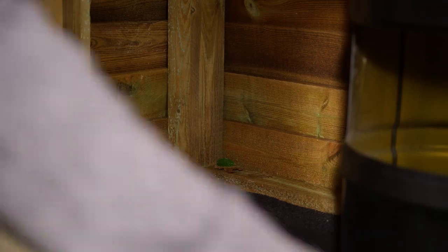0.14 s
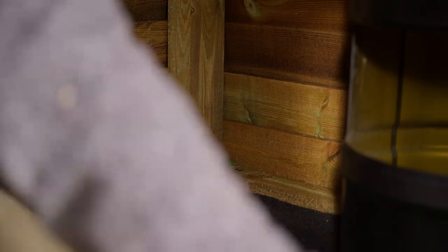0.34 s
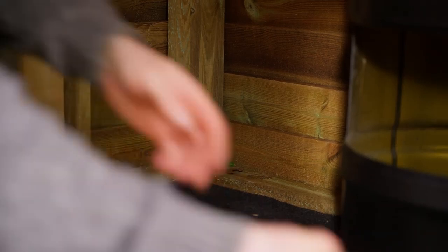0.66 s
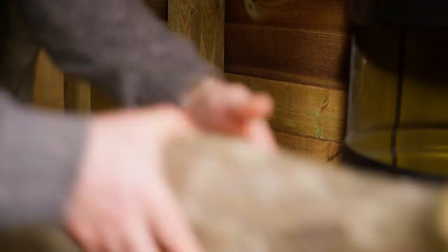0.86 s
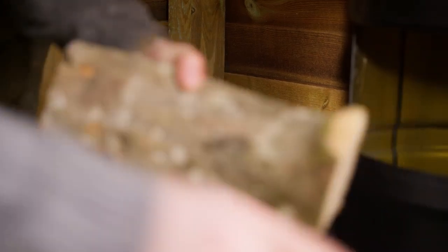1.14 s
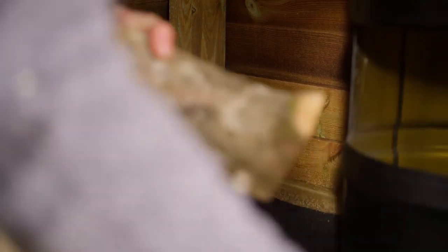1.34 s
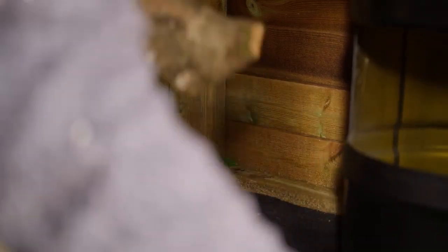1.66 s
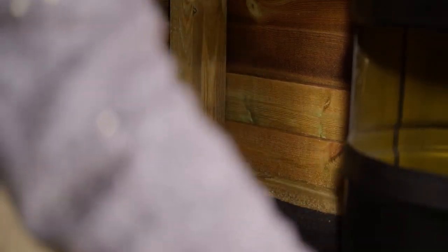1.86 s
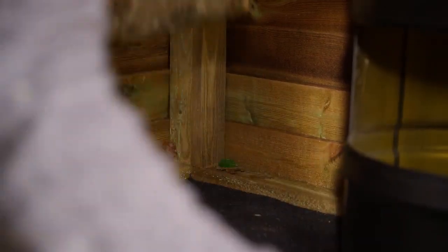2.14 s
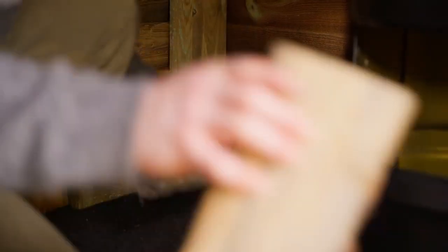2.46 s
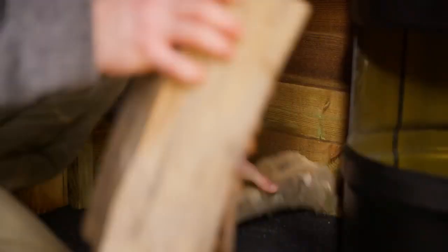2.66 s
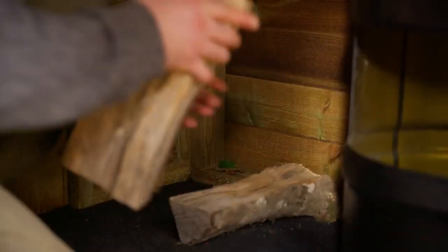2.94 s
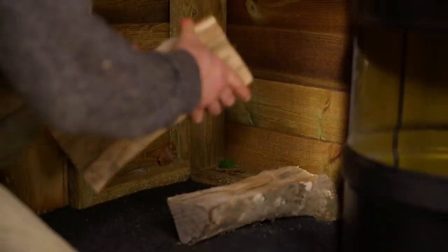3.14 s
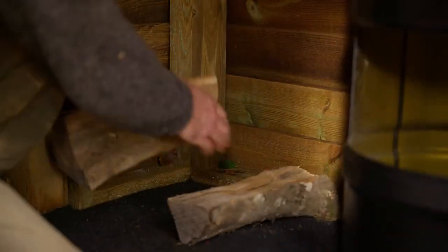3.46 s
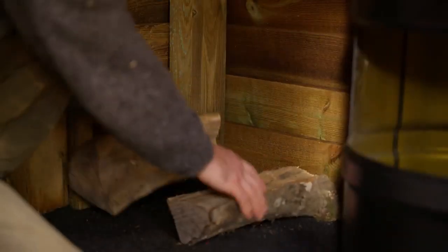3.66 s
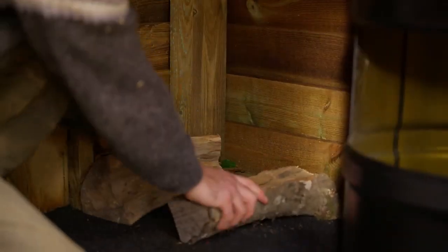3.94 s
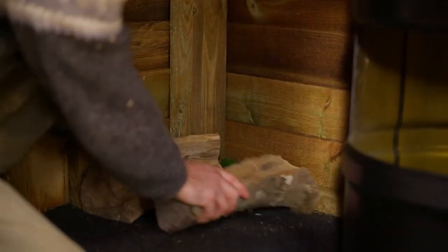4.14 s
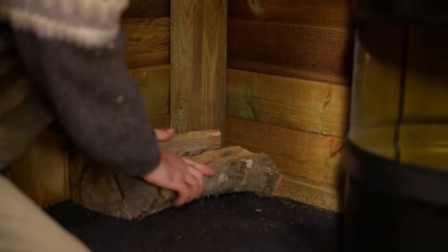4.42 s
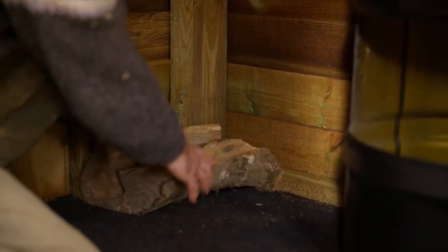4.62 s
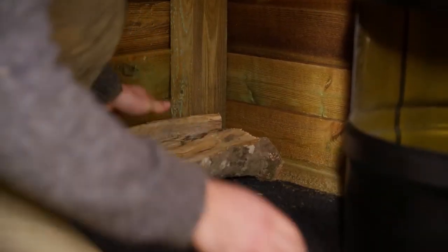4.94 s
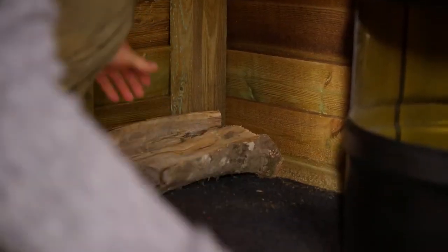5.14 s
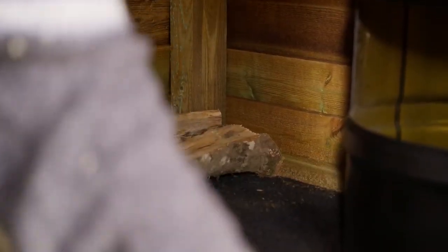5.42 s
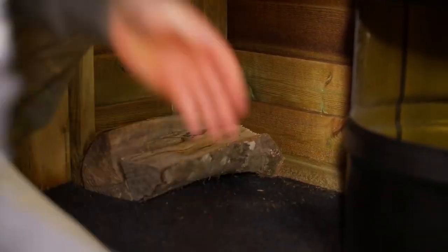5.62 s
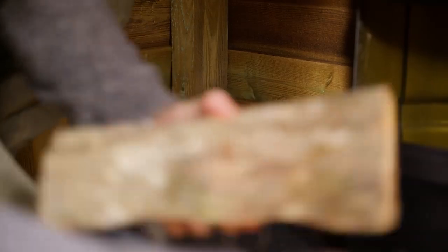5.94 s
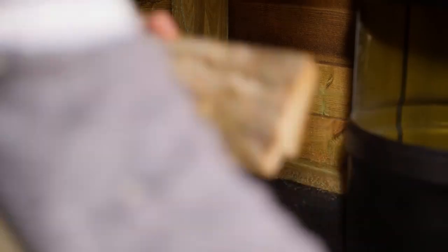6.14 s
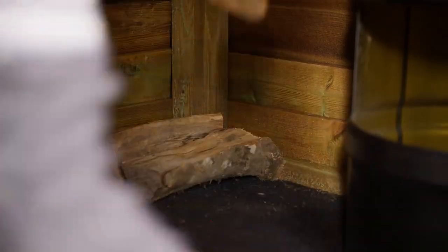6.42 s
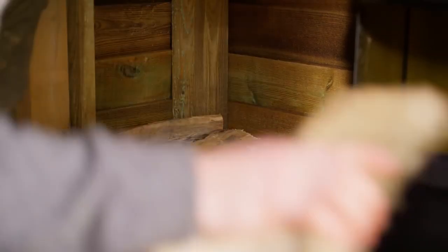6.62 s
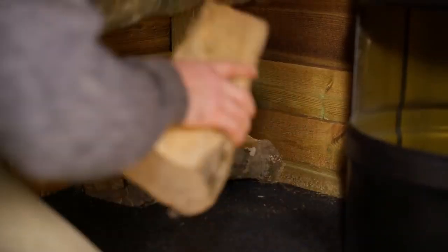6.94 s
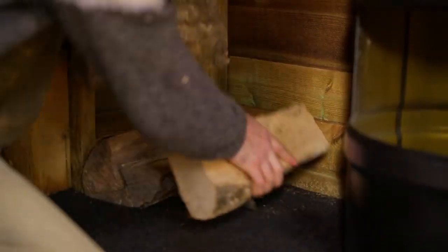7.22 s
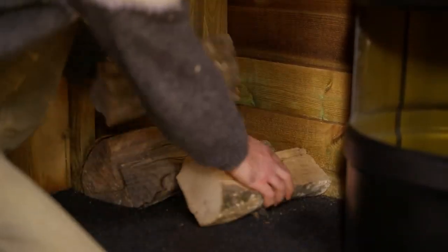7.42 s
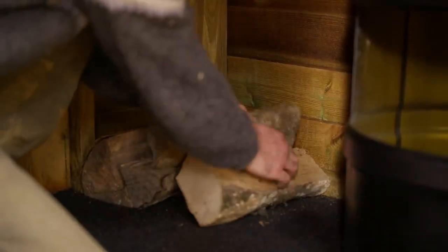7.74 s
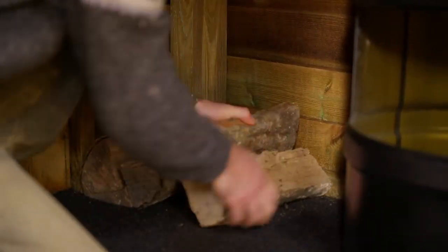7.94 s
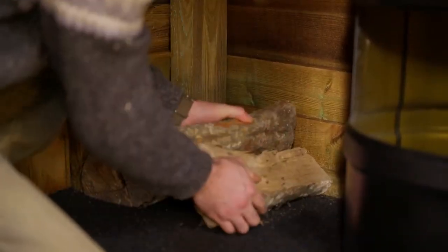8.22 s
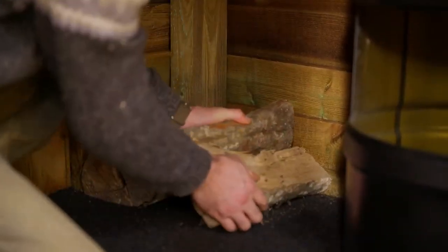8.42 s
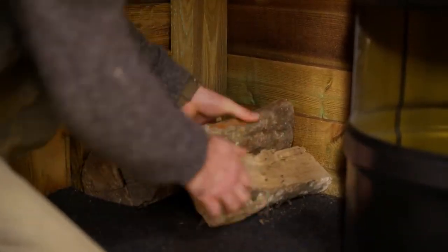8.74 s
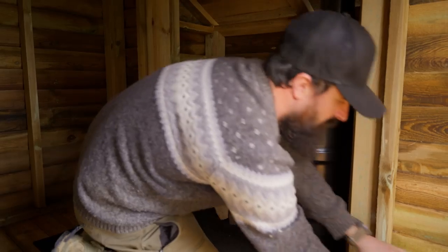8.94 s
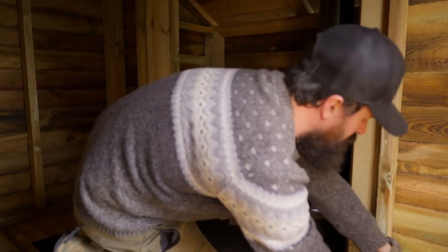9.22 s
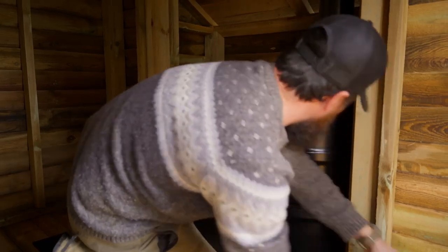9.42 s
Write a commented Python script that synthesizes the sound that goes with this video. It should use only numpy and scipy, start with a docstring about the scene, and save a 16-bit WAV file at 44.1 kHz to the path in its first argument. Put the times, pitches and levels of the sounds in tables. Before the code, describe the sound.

Split firewood logs are stacked by hand in a small wooden cabin, knocking hollowly together and on the floor, with rustling sleeves and scraping bark.

```python
"""Split firewood is stacked by hand in a small wooden cabin, close to the microphone.
First, over still air, wool sleeves rustle (rubbing fibres) and boards thud softly (filtered noise).
Bark soon scrapes and ticks (trains of tiny slips). From 1.5 s logs knock in bunches (ringing modes and a crack),
and from 2.8 s the heaviest landings set a steel stove ringing faintly (long dying sines).
Splinters snap at 4.4 s and 5.9 s (very short high sines); the last knocks come near 7.9 s, then softer handling."""
import sys
import numpy as np
from scipy import signal
from scipy.fft import rfft, irfft
from scipy.io import wavfile
from scipy.ndimage import uniform_filter1d

SR = 44100
rng = np.random.default_rng(int(sys.argv[2]) if len(sys.argv) > 2 else 0)


def waveform_to_disk(signal):
    """Save audio, clipped to [-1, 1], as 16-bit WAV at the path in sys.argv[1]."""
    frames = np.transpose(np.atleast_2d(signal))
    scaled = np.clip(frames, -1, 1) * 32767
    samples = np.round(scaled).astype(np.int16)
    wavfile.write(sys.argv[1], SR, samples)


N = 422037  # length of the scene [samples]


def amp(db):
    """Turns decibels into a gain."""
    return 10 ** (np.asarray(db) / 20)


def unit(x):
    """Scales a sound to rms 1."""
    return x / np.sqrt(np.mean(x ** 2) + 1e-20)


def read(points, hz):
    """Reads a curve given as (frequency [Hz], value) points, joined along a log-frequency axis."""
    f, value = np.transpose(points)
    return np.interp(np.log(hz + 1), np.log(f), value)


def seconds(length):
    """Makes a time axis of the given length [s]."""
    return np.arange(int(length * SR)) / SR


def add(mix, s, sound):
    """Adds a sound to the mix, starting at time s [s]."""
    part = mix[max(round(s * SR), 0):][:len(sound)]
    part += sound[:len(part)]


def filtered(x, hz, kind, order=2):
    """Keeps the lows ("low") or the highs ("high") with a Butterworth filter."""
    hz = np.clip(hz, 10, SR / 2 - 100)
    return signal.sosfilt(signal.butter(order, hz, kind, fs=SR, output="sos"), x)


def colour(x, spectrum, treble_db=0, shelf_hz=4000):
    """Gives x a spectrum and more or less treble, at rms 1."""
    hz = np.fft.rfftfreq(len(x), 1 / SR)
    shelf_db = treble_db * hz ** 2 / (hz ** 2 + shelf_hz ** 2)
    return unit(irfft(rfft(x) * amp(read(spectrum, hz) + shelf_db), len(x)))


def ring(modes, length, detune=1):
    """Dying sines: what a body does after one blow; neighbouring modes swing opposite ways."""
    t = seconds(length)
    sines = []
    for k, (hz, db, t60) in enumerate(modes):
        fade = amp(db - 60 * t / t60)
        sines.append((-1) ** k * fade * np.sin(2 * np.pi * hz * detune * t))
    return sum(sines)


def burst(noise, t60, rise):
    """Noise that swells as a contact closes, then dies; times in seconds."""
    t = np.arange(len(noise)) / SR
    shape = amp(-60 * t / t60) * (1 - np.exp(-t / rise))
    return unit(noise * shape) * np.sqrt(np.mean(shape ** 2))


def grains(size, per_s, spread_db):
    """A random train of tiny slips, mostly small and a few large."""
    chance = rng.random(size)
    strength = np.minimum(rng.exponential(1, size), 4)
    sign = rng.choice([-1., 1.], size)
    return (chance < per_s / SR) * amp(spread_db * strength) * sign


def swell(t, length):
    """A stroke that grows and fades evenly around t = 0."""
    return np.exp(-(2 * t / length) ** 2)


# spectrum of the still air: (frequency [Hz], level [dB])
AIR_SPECTRUM = [(18, -36.5), (30, -4), (48, -15.5), (98, -0.5), (199, -7), (280, -1), (632, -7.5),
                (760, -6), (1220, -9), (3400, -14.5), (14000, -26), (16000, -25)]
AIR_DB = -69  # rms level


def still_air():
    """Steady noise with the uneven colour of quiet air."""
    return amp(AIR_DB) * colour(rng.standard_normal(N), AIR_SPECTRUM)


# spectrum of bark, for crumbs, scrapes and taps: (frequency [Hz], level [dB])
BARK_SPECTRUM = [(100, -11), (400, -1.5), (900, 0), (2000, -1.5), (4000, -2), (7000, -3), (10000, -7),
                 (13000, -11.5), (16000, -14.5)]
# spectrum of rubbing wool: (frequency [Hz], level [dB])
WOOL_SPECTRUM = [(50, -18.5), (150, 9.5), (400, 10.5), (900, 5.5), (2000, 0.5), (4000, -2.5), (6500, -5),
                 (9000, -12), (16000, -17)]
# each reach or lift of the arms, one swell of rustling: (middle time [s], length [s], level [dB])
REACHES = [(0.495, 1.22, -62), (2.3, 1.15, -59), (3.2, .25, -61.5), (4.205, 0.14, -55), (4.703, 1.5, -72),
           (6.1, 1.1, -71), (7.929, 0.23, -64.5), (9.25, 1.94, -65)]
# crumbs of bark: rate [per s], spread of sizes [dB], level against the rustle [dB]
CRUMBS_PER_S, CRUMB_SPREAD_DB, CRUMB_DB = 11, 3.5, -13


def sleeves():
    """Wool fibres rub and crumbs of bark tick, both louder as the arms move."""
    t = np.arange(N) / SR
    motion = sum(amp(db) * swell(t - middle, length) for middle, length, db in REACHES)
    fibres = colour(grains(size=N, per_s=27000, spread_db=3.5), WOOL_SPECTRUM)
    tick = burst(rng.standard_normal(2048), t60=0.028, rise=.001)
    crumb_train = grains(N, CRUMBS_PER_S, CRUMB_SPREAD_DB)
    crumbs = colour(signal.oaconvolve(crumb_train, tick)[:N], BARK_SPECTRUM)
    return motion * (fibres + amp(CRUMB_DB) * crumbs)


# soft bumps of knees, hands and shifting wood on the boards: (time [s], level [dB], centre frequency [Hz])
BUMPS = [(.015, -54, 197), (.572, -36.5, 182), (.632, -31.5, 170), (.662, -36.5, 274), (.748, -33, 175),
         (.782, -27, 208), (.858, -34, 252), (.895, -39, 190), (1.207, -51.5, 166), (1.487, -41, 228),
         (1.508, -31.5, 175.5), (1.8, -41.5, 197), (2.145, -41, 205), (2.205, -49.5, 226),
         (4.408, -44.5, 300), (4.464, -29, 188), (4.632, -45.5, 197), (5.585, -34, 165.4),
         (5.625, -39.5, 318), (6.33, -57.5, 250), (7.888, -31.5, 172.6), (8.004, -37, 160),
         (8.524, -49, 185), (9.26, -46.5, 188.2), (9.33, -44.5, 242), (9.376, -45.5, 150),
         (9.448, -40, 228), (9.508, -42, 226)]


def bumps():
    """Soft pushes reach mainly the low, crowded modes of the boards."""
    out = np.zeros(N)
    # low swings of the boards: (frequency [Hz], level [dB], time to fall 60 dB [s])
    boom = ring([(140.2, -1.4, 0.21), (172.0, 0.89, 0.3), (206.3, -0.75, 0.45)], length=.5)
    for s, db, hz in BUMPS:
        boards = [(hz / 4, -30), (hz / 2, -9), (hz, 0), (hz * 1.6, -6), (hz * 3, -24), (hz * 10, -60)]
        thud = burst(colour(rng.standard_normal(len(boom)), boards), t60=0.15, rise=0.0037)
        add(out, s, amp(db) * filtered(thud + amp(-8) * boom, 3 * hz, "low"))
    return out


def grit(size, count):
    """Flakes of bark flick loose; each of the count pitches has its own train of brief rings."""
    pitches = 1400 * 5 ** rng.random(count)  # 1400 to 7000 Hz
    flakes = 0
    for hz in pitches:
        flick = ring([(hz, 0, .012)], length=0.016)
        flakes = flakes + signal.oaconvolve(grains(size, per_s=24, spread_db=4.0), flick)[:size]
    return unit(flakes)


# bark sliding under hands or on wood:
# (middle time [s], length [s], level [dB], treble against the body [dB])
SCRAPES = [(0.383, .038, -60, 14), (0.616, 0.074, -51.5, 6), (.685, 0.047, -52, -13),
           (1.084, 0.048, -48, -4.5), (1.17, 0.018, -58, 32), (1.507, 0.081, -51, -13),
           (1.808, 0.11, -58.5, -7), (1.878, 0.039, -49, -3), (2.265, 0.11, -47, -24.5),
           (2.552, 0.18, -60.5, -11.5), (3.158, .041, -58.5, 8), (3.256, 0.1, -57.5, 10),
           (3.489, 0.066, -64.5, -7), (3.822, 0.063, -54, 0), (3.87, 0.06, -47.5, -16),
           (4.188, .14, -52.5, -0.5), (4.313, 0.044, -62, -3), (4.453, 0.02, -43.5, 13),
           (4.624, 0.052, -56.5, -42), (5.639, 0.073, -56.5, -12), (5.953, 0.066, -57, 5),
           (6.111, 0.1, -63.5, 5), (6.359, 0.13, -68, 1), (7.4, 0.09, -61, 8.5), (7.452, .03, -50.5, -14),
           (7.778, .073, -58, 6), (8.208, 0.18, -64, -7.5), (8.485, 0.11, -64, -5), (8.81, 0.059, -62, 2),
           (9.343, 0.031, -51, -20), (9.521, 0.13, -60.5, -14)]
# a stroke is uneven: depth of its catching and slipping [dB], rough length of one catch [s]
CATCH_DB, CATCH_S = 3, .009


def scrapes():
    """Rough bark catches and slips many times as a stroke swells and fades."""
    out = np.zeros(N)
    for middle, length, db, treble_db in SCRAPES:
        slips = colour(grains(size=32768, per_s=2300, spread_db=1.5), BARK_SPECTRUM, treble_db)
        slow_noise = filtered(rng.standard_normal(len(slips)), .5 / CATCH_S, "low")
        catches = amp(CATCH_DB * unit(slow_noise))
        stroke = unit(catches * (slips + amp(-7.5) * grit(size=len(slips), count=16)))
        t = (np.arange(len(slips)) - len(slips) / 2) / SR
        add(out, middle + t[0], amp(db) * stroke * swell(t, length))
    return out


# light taps of bark and fingers on wood:
# (time [s], level [dB], treble against the body [dB], ring of the touched spot [Hz])
TAPS = [(.527, -48.5, 1, 3010), (.585, -47, 14, 2200), (.66, -37.5, -16, 2210), (.781, -32, -14, 2150),
        (.856, -43, -15, 1915), (1.522, -46, -8, 1710), (1.58, -48, -17, 1670), (1.606, -49.5, -16, 3320),
        (1.694, -51.5, -3, 2240), (1.823, -46, -2, 6040), (2.388, -35, -10, 3380), (2.814, -44, -12, 2050),
        (3.136, -52.5, 3, 1700), (3.249, -47, 15, 3366), (3.995, -53.5, -2, 3496), (4.407, -49.5, -9, 1525),
        (4.435, -45.5, 0, 1500), (4.613, -52, 14, 1900), (4.669, -42, -10, 2340), (5.479, -57, 10.5, 7000),
        (5.587, -46, 0, 6650), (5.618, -44, 14, 2600), (5.943, -42.5, -2.5, 2550), (5.984, -47, -12, 1894),
        (6.271, -46, 3, 2360), (7.371, -43, 10.5, 3050), (7.423, -46, 10, 1650), (7.76, -46, 15, 2680),
        (7.882, -55, 1, 1780), (7.999, -53, -6, 6200), (8.207, -54.5, -19, 4380), (8.475, -46.5, -3, 5880),
        (9.464, -54, -12, 3580), (9.555, -56, -22, 2550)]
# ring under a tap: level against the tick at zero treble [dB], time to fall 60 dB [s];
# a dull, firm tap rings more than a bright flick: ring change per dB of treble [dB]
TAP_RING_DB, TAP_RING_T60, RING_PER_TREBLE = -7, 0.056, -.3


def taps():
    """Brief dry ticks of crumbling bark, each with a ring of the wood beneath."""
    out = np.zeros(N)
    for s, db, treble_db, hz in TAPS:
        crumble = colour(grains(size=4096, per_s=11000, spread_db=3.5), BARK_SPECTRUM, treble_db)
        add(out, s, amp(db) * burst(crumble, t60=0.066, rise=0.0026))
        ring_db = TAP_RING_DB + RING_PER_TREBLE * treble_db
        add(out, s, amp(db) * ring([(hz, ring_db, TAP_RING_T60)], length=0.11))
    return out


# bending modes of each log, and of the bark-covered one when struck at its end; under each log's name:
# (frequency [Hz], level [dB], time to fall 60 dB [s])
LOG_MODES = {"pile": [(324, -4, 0.075), (400, -3, 0.078), (480, 4, 0.034), (590.6, 0, 0.11),
             (702, -9.5, 0.032), (887, -15, 0.033), (1020, -11.5, 0.03), (1370, -9, .05), (1470, -6, 0.045),
             (1576, -8.5, 0.033)], "bark": [(432, -10, 0.041), (529.8, 1, 0.062), (603.8, 0, 0.069),
             (843, -11, 0.063), (1040.5, -21, 0.057), (1274, -14.5, 0.068), (1546, -26, 0.043),
             (1894, -25, 0.035), (2350, -35.5, 0.065)], "bark end": [(505, -1.5, 0.043), (820, 9, 0.02),
             (1080, -2, 0.027), (1230, -1.5, 0.065), (1387, 1, 0.066), (1500, -4.5, 0.077),
             (1880, -33, 0.09), (2500, -20, .08)], "split": [(272, 1.5, 0.041), (355, 3, 0.045),
             (484, 0, 0.059), (750, -8.5, 0.033), (883, -5, .045), (1230, -15.5, 0.037), (1450, -24, 0.024),
             (1930, -17, 0.033)], "pale": [(285, 3, 0.09), (462, -5.5, 0.1), (580, 1, 0.083),
             (706, -3, 0.025), (758, -4.5, 0.15), (864, -3.5, 0.033), (1034, -2, 0.029),
             (1257, -7.5, 0.067), (1367, -12.5, 0.044), (1900, -23, .05)]}
# modes of the hollow floor: (frequency [Hz], level [dB], time to fall 60 dB [s])
FLOOR_MODES = [(108, -22, 0.57), (122.4, -13.5, 0.22), (165.6, -8, 0.17), (192.3, -13, 0.13),
               (227.3, -12.5, 0.35), (239, -9, 0.068), (286.6, 3.5, 0.056), (308.2, 2, 0.1),
               (345, -6.5, 0.2)]
# spectrum of the crack of wood on wood: (frequency [Hz], level [dB])
CRACK_SPECTRUM = [(60, -34), (150, -4), (400, 1.5), (1000, 0.5), (1500, -7.5), (2200, -8), (4000, -11),
                  (8000, -13.5), (16000, -13.5)]
# one row a contact: (time [s], log name, log ring level [dB], floor boom level [dB], crack level [dB],
# hardness [Hz]: the crack is weak above it, the ring and boom above twice it)
KNOCKS = [(1.487, "pile", -50, -58, -25, 4630), (1.744, "pile", -39, -37.5, -29, 4400),
          (1.8711, "pile", -12.5, -32, -16.5, 1700), (1.886, "pile", -21.5, -12.5, -15.5, 1060),
          (1.937, "pile", -40, -24, -38, 1200), (2.821, "bark", -30, -17, -43, 393),
          (2.832, "bark", -18.5, -9.5, -13, 700), (2.837, "bark", -11, -12, -13.5, 1410),
          (2.858, "bark", -22.5, -16, -14, 800), (2.891, "bark", -37.5, -27, -20, 450),
          (3.863, "split", -46, -43.5, -26, 895), (3.8808, "split", -9, -22.5, -9.5, 1510),
          (3.887, "split", -21, -22, -24.5, 1190), (3.936, "split", -21, -33, -19.5, 600),
          (4.452, "bark end", -29.5, -39, -25.5, 3930), (4.468, "bark end", -41, -44, -32, 1495),
          (7.4407, "pale", -21, -38, -53.5, 205.4), (7.447, "pale", -8.5, -37.5, -30, 205),
          (7.469, "pale", -10.5, -19.5, -7, 1263), (7.475, "pale", -8.5, -9.5, -13, 1195),
          (7.502, "pale", -13, -16, -19.5, 211.4), (7.789, "bark", -40, -33.5, -42.5, 1480),
          (7.885, "bark", -39.5, -36, -42, 1500)]


def knocks():
    """Each contact rings a log, booms the floor and cracks."""
    out = np.zeros(N)
    boom = ring(FLOOR_MODES, length=.5)
    for s, log, log_db, floor_db, crack_db, hard_hz in KNOCKS:
        # crowded, heavily damped modes blur into noise
        crack = burst(colour(rng.standard_normal(8192), CRACK_SPECTRUM), t60=.058, rise=0.0012)
        grip = 1 + 0.008 * (rng.random() - .5)  # the hold on a log shifts its pitch a little
        log_ring = ring(LOG_MODES[log], length=.5, detune=grip)
        body = amp(log_db) * log_ring + amp(floor_db) * boom
        add(out, s, filtered(body, 2 * hard_hz, "low", order=4))
        add(out, s, amp(crack_db) * filtered(crack, hard_hz, "low"))
    return out


# modes of the stove's steel shell: (frequency [Hz], level before the jolt's weighting [dB],
# time to fall 60 dB [s])
STOVE_MODES = [(242.2, 1, 3.1), (274.5, -9, 2.9), (317.6, -1, 3.3), (360.7, -8, 2.9), (403.7, -7, 3.1),
               (425.3, 0, 4.1), (489.9, -8, 3.6), (527.6, -1, 3.9), (560, -10, 1.5), (608.3, -6, 2.2),
               (689, -12, 1.8), (755, -10, 1.8), (829, -11, 1.6), (985, -8, 1.1), (1090, -6, 1),
               (1184, -10, 1.1), (1330, -8, .7)]
# heavy landings that shake the stove: (time [s], level [dB], frequency where the jolt is strongest [Hz])
JOLTS = [(2.839, -52, 336.7), (3.881, -55.5, 590), (7.471, -45.5, 476)]


def stove():
    """The steel shell sings on for seconds after a log lands, most where the jolt is strongest."""
    out = np.zeros(N)
    for s, db, jolt_hz in JOLTS:
        modes = []
        for hz, mode_db, t60 in STOVE_MODES:
            octaves_away = np.log2(hz / jolt_hz)
            modes.append((hz, mode_db - 2.0 * octaves_away ** 2, t60))
        add(out, s, amp(db) * ring(modes, length=N / SR - s))
    return out


# splinters that snap: (time [s], level [dB])
SNAPS = [(4.437, -54), (5.9187, -34.5)]


def snaps():
    """A splinter breaks right by the microphone: a very short, bright click of three dying sines."""
    out = np.zeros(N)
    for s, db in SNAPS:
        click = ring([(6700, 1, 0.0049), (9300, 4.4, 0.0029), (12150, 11.8, 0.0044)], length=.02)
        add(out, s, amp(db) * click)
    return out


# how fast the cabin's sound dies: (frequency [Hz], time to fall 60 dB [s])
CABIN_DECAY = [(100, 0.27), (250, 0.29), (600, 0.25), (1500, .24), (4000, 0.2), (12000, 0.088)]
# first echoes off the near walls: (delay [s], gain before the echo level)
WALL_ECHOES = [(.0042, 0.2), (.0071, -0.13), (0.0108, .2), (.016, .22), (.0235, -.15)]


def cabin(x, wet_db, echo_db):
    """Direct sound, a few echoes off the close plank walls, and a short dense tail."""
    t = seconds(length=0.55)
    hz, at, z = signal.stft(rng.standard_normal(len(t)), SR, nperseg=256)
    fade = amp(-60 * at / read(CABIN_DECAY, hz)[:, None])
    tail = signal.istft(z * fade, SR, nperseg=256)[1][:len(t)]
    tail *= 1 - np.exp(-(t / 0.0045) ** 2)  # reflections need time to crowd
    response = amp(wet_db) * tail / np.linalg.norm(tail)
    for s, gain in WALL_ECHOES:
        add(response, s, amp([echo_db]) * gain)
    return x + signal.oaconvolve(x, response)[:N]


def scene():
    """Wood, bark and cloth in the cabin, over still air."""
    light = cabin(sleeves() + scrapes() + taps(), wet_db=-10.5, echo_db=-11)
    heavy = cabin(bumps() + knocks(), wet_db=-8.0, echo_db=-9)
    return (still_air() + light + heavy + stove() + snaps())[None]


def limiter(x, ceiling, recovery_db_per_s):
    """Turns the gain down quickly on a loud peak and lets it come back slowly."""
    over_db = 20 * np.log10(np.maximum(abs(x[0]) / ceiling, 1))
    fall = np.arange(N) * recovery_db_per_s / SR
    held_db = np.maximum.accumulate(over_db + fall) - fall
    return x / amp(uniform_filter1d(held_db, size=40))  # smoothed over about 1 ms


EDGE_HZ = 15900  # upper band limit


def record(dry):
    """The microphone cuts the bass, a limiter holds the loudest knocks, then the top is cut off."""
    no_bass = filtered(dry, hz=84, kind="high", order=4)
    held = limiter(no_bass, ceiling=0.62, recovery_db_per_s=28.5)
    band = signal.firwin(511, EDGE_HZ, window=("kaiser", 9), fs=SR)
    return signal.oaconvolve(held, band[None], "same")


dry = scene()
out = record(dry)
waveform_to_disk(out)
```